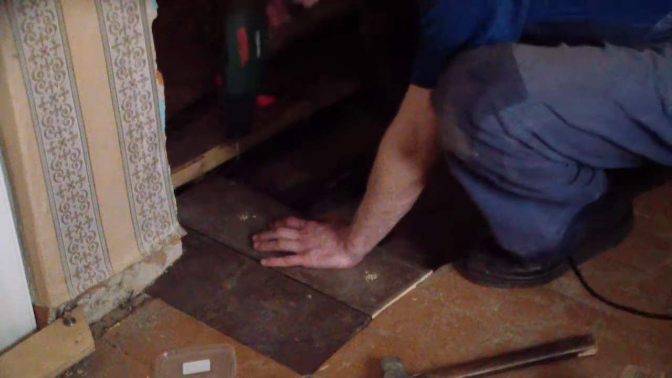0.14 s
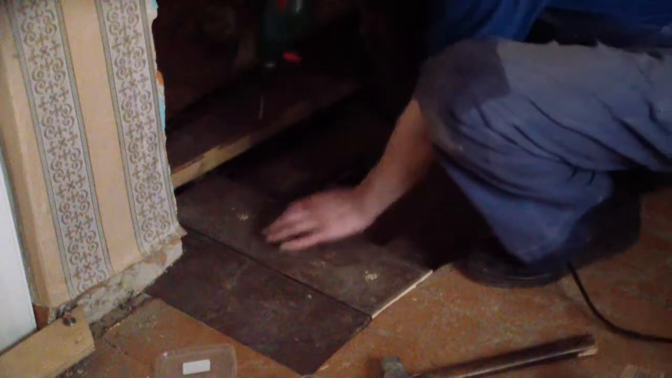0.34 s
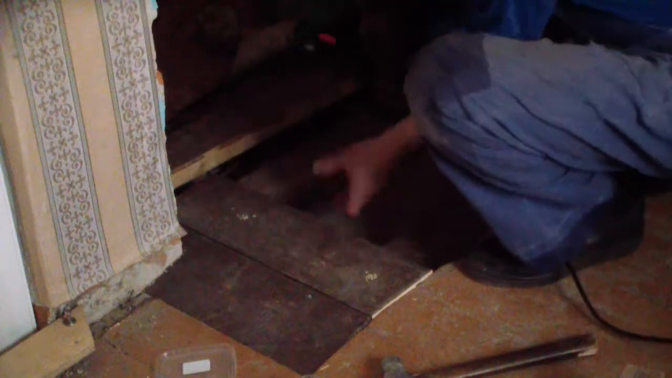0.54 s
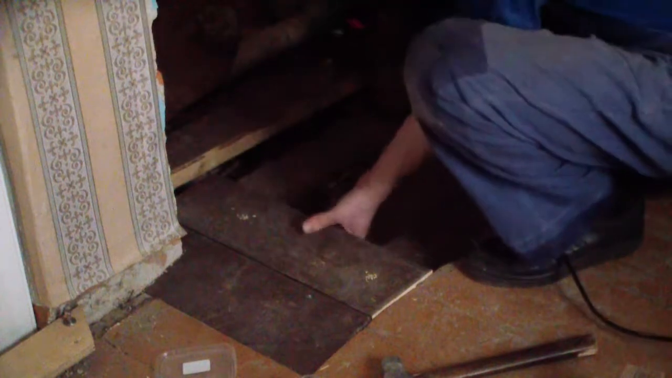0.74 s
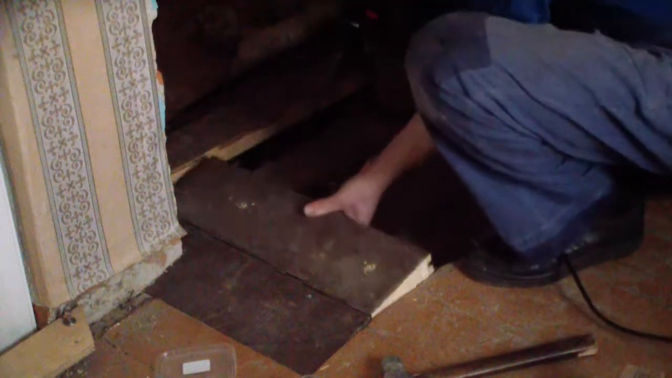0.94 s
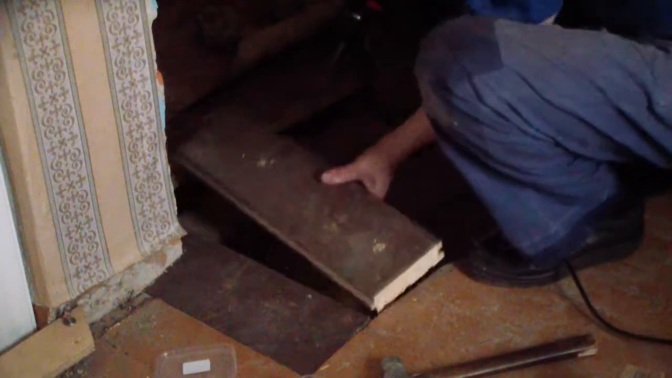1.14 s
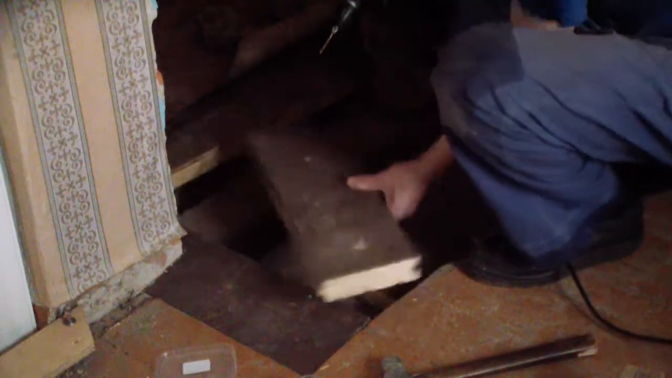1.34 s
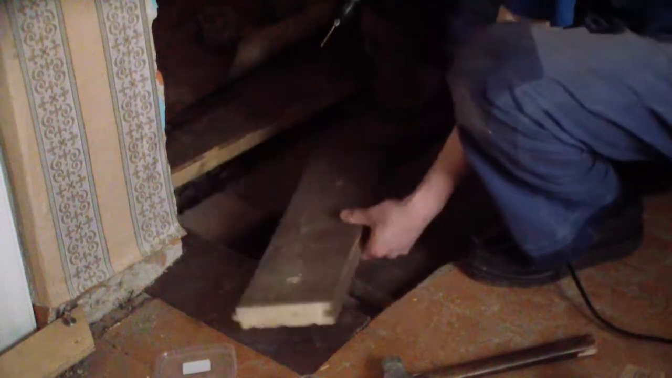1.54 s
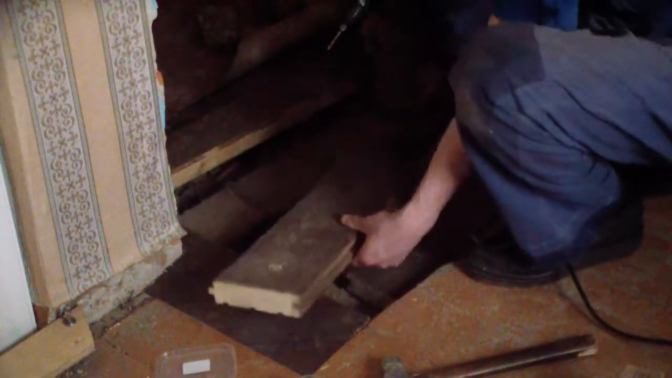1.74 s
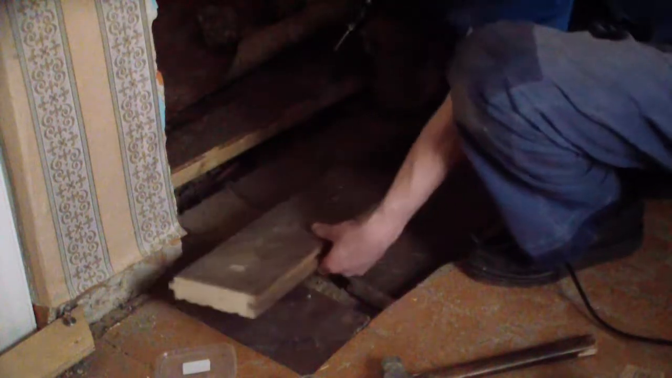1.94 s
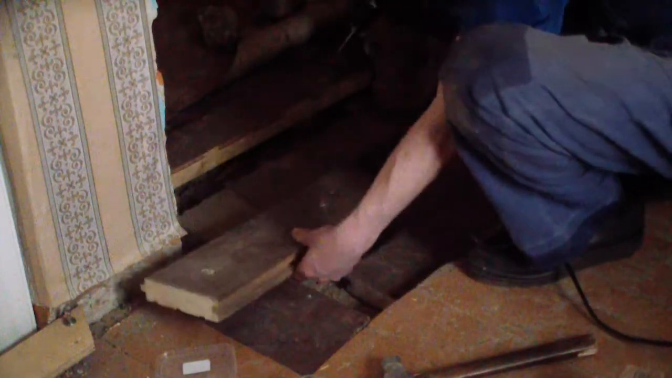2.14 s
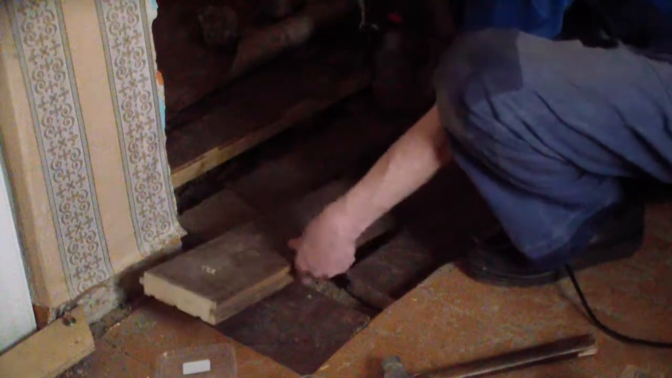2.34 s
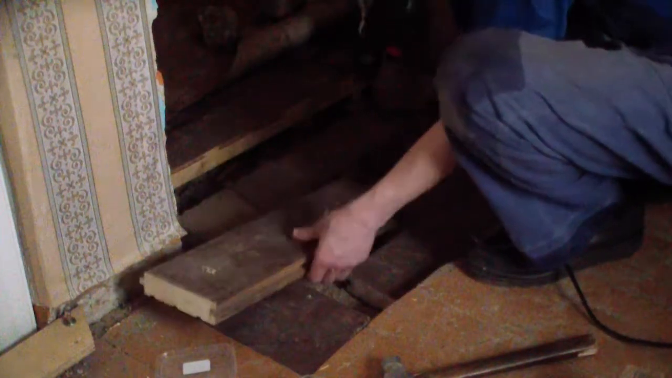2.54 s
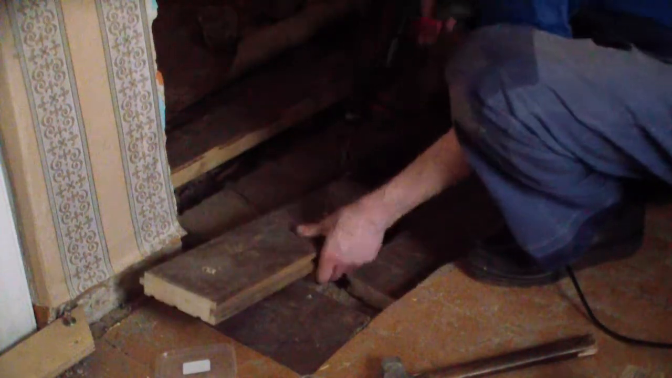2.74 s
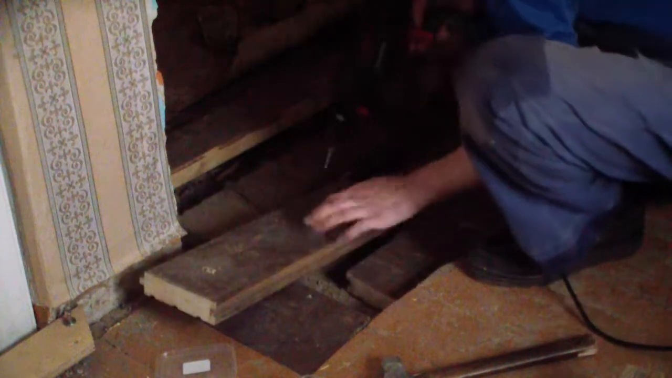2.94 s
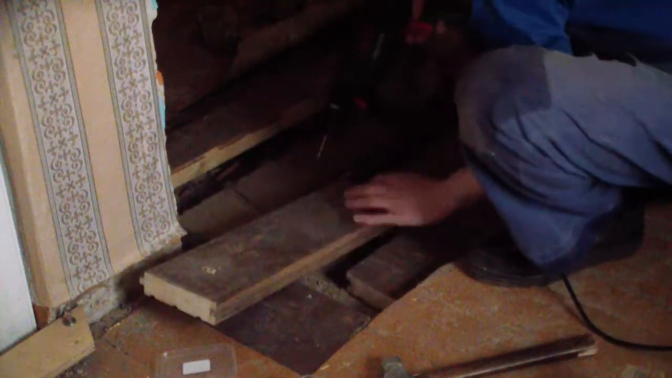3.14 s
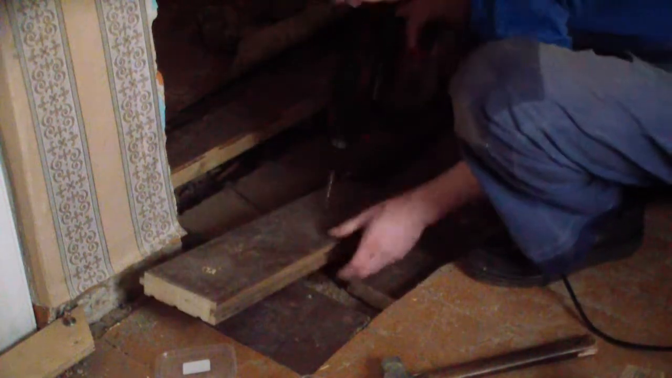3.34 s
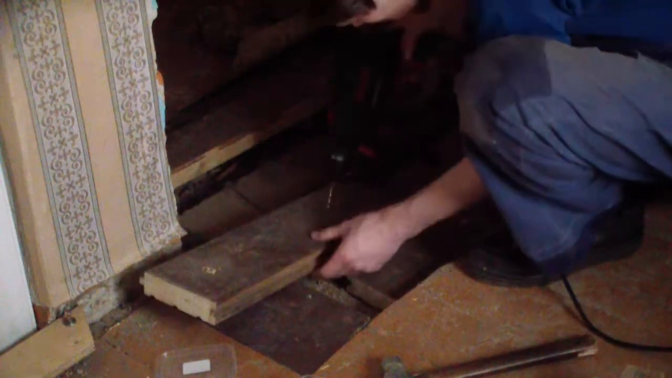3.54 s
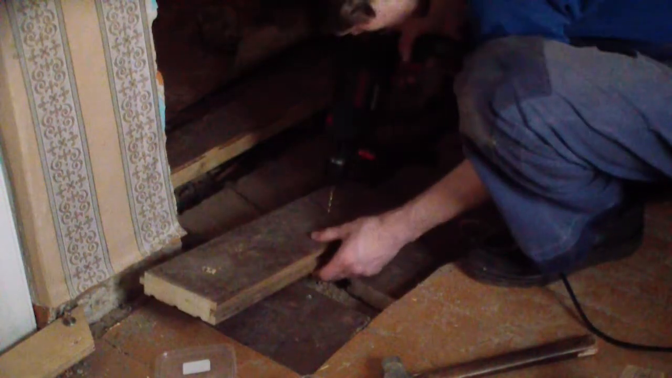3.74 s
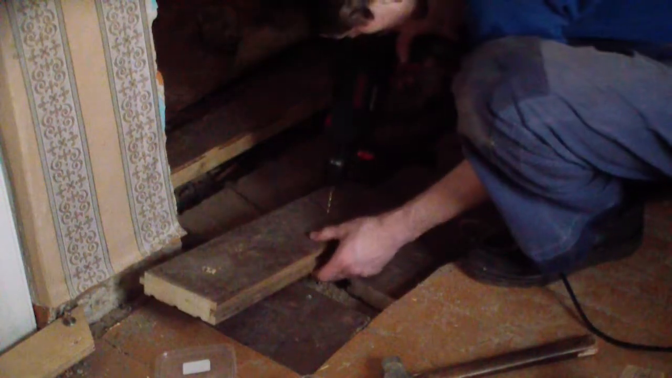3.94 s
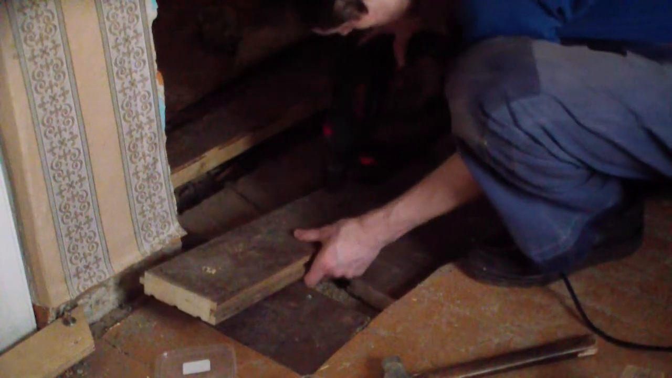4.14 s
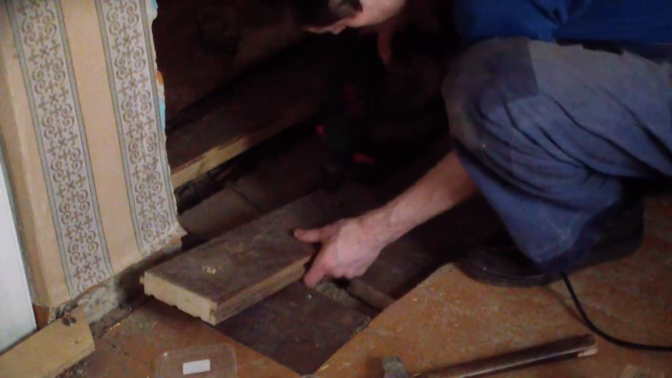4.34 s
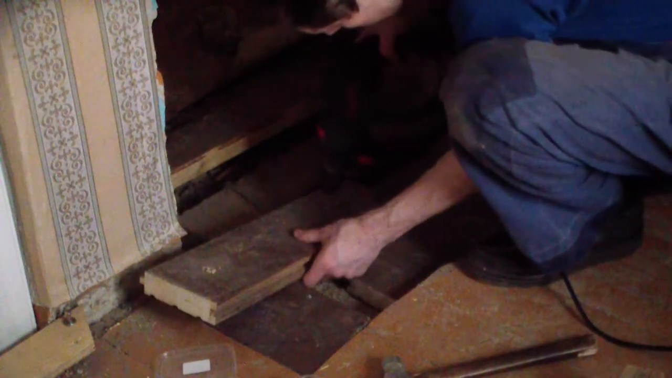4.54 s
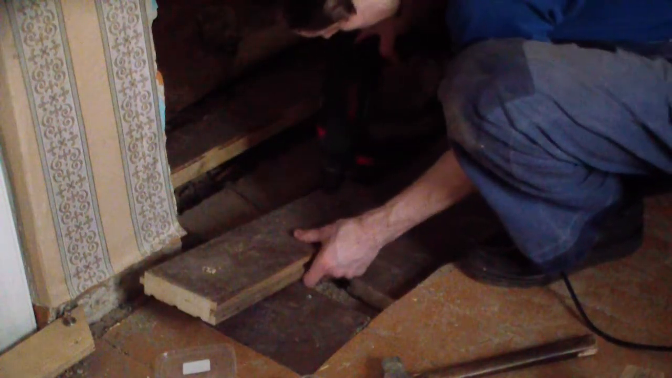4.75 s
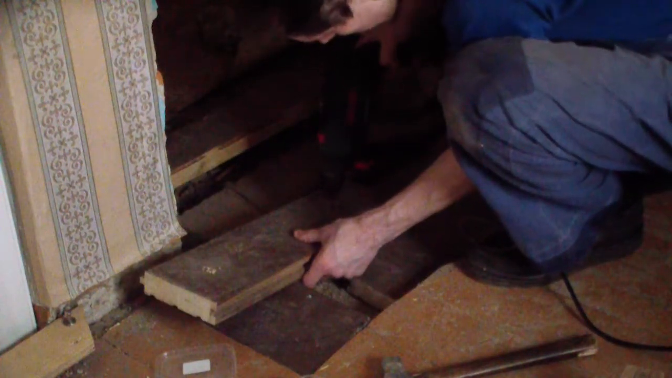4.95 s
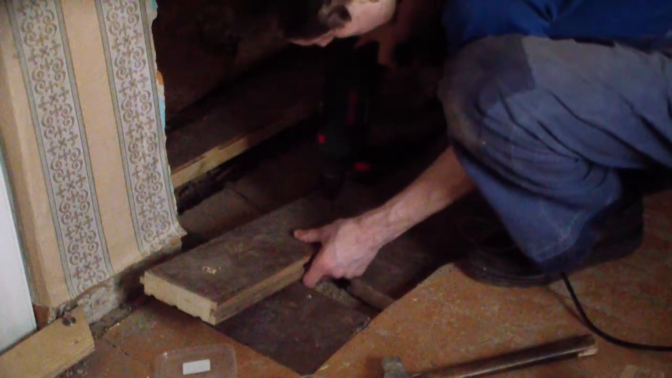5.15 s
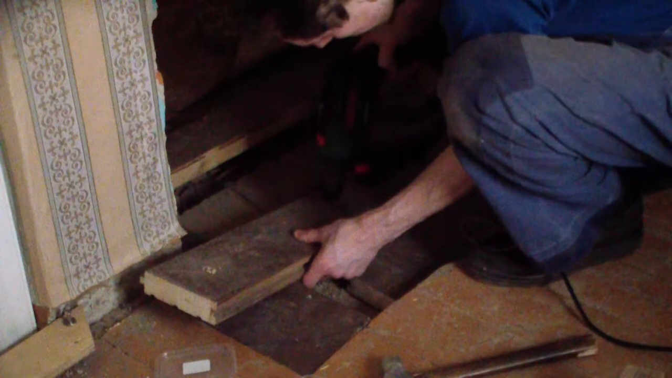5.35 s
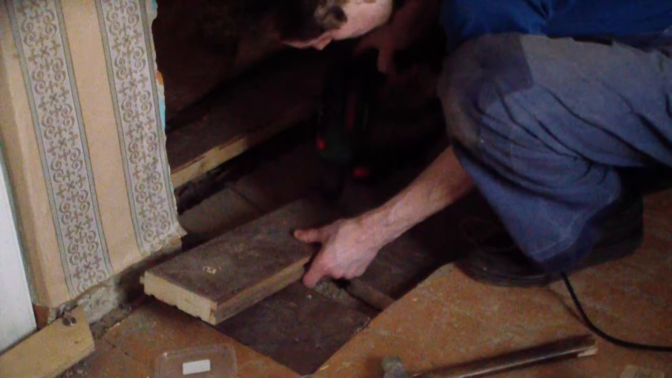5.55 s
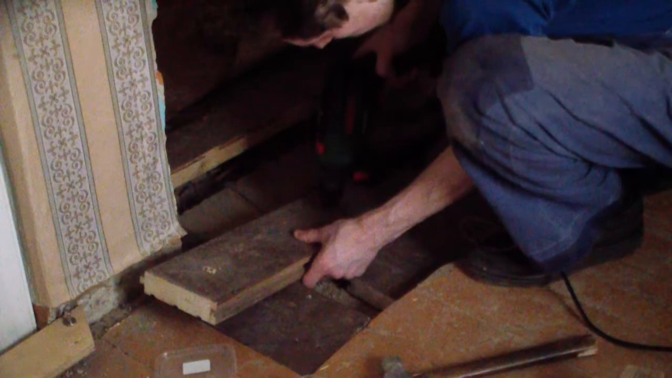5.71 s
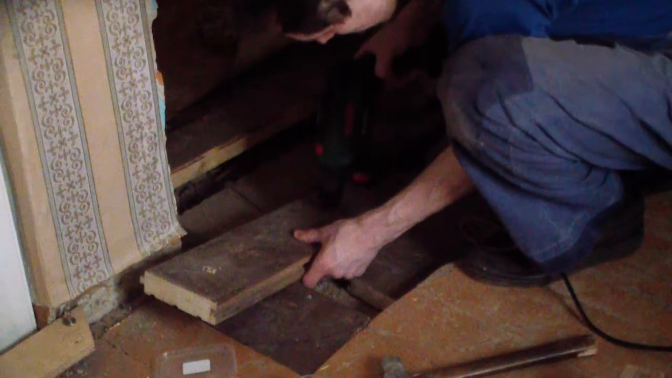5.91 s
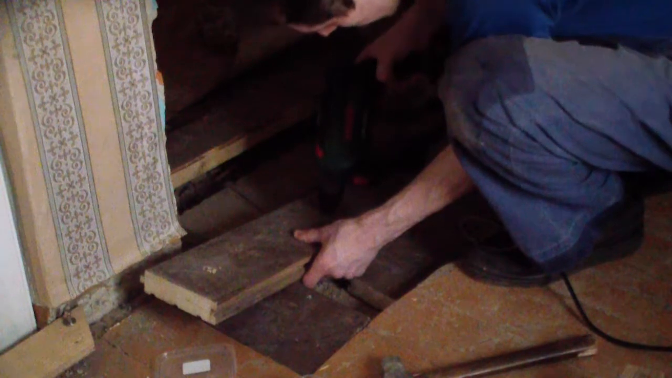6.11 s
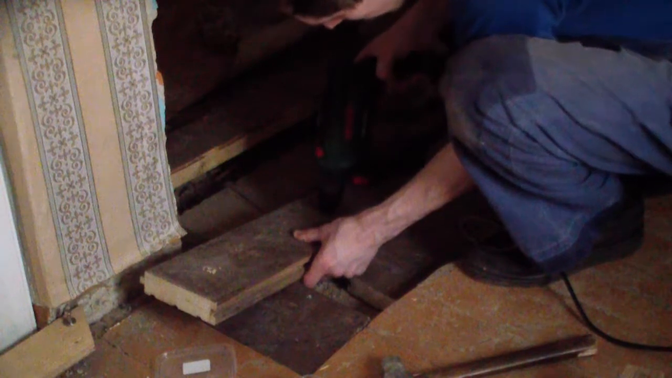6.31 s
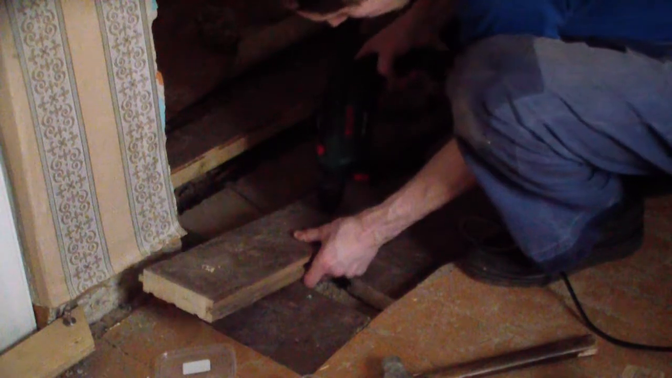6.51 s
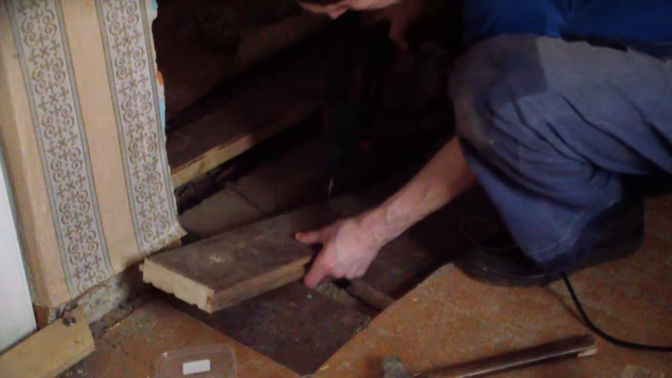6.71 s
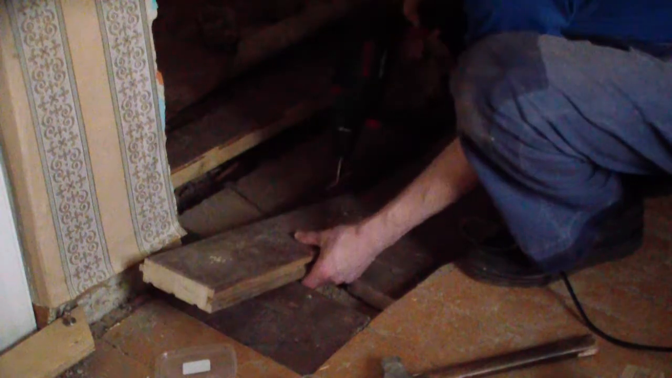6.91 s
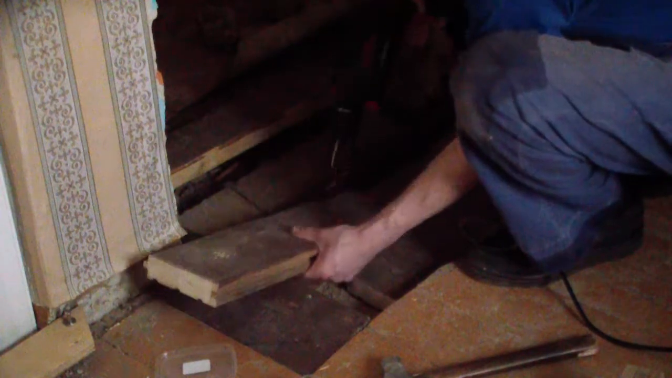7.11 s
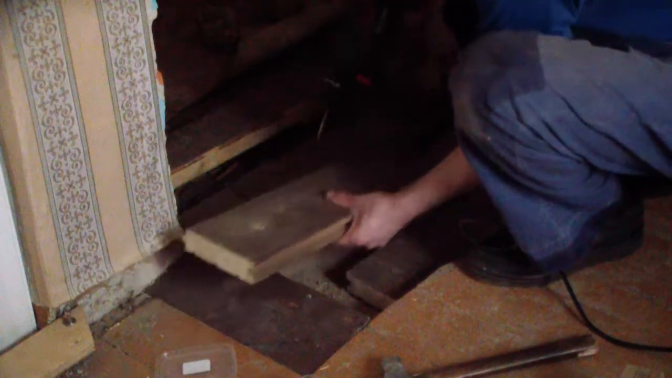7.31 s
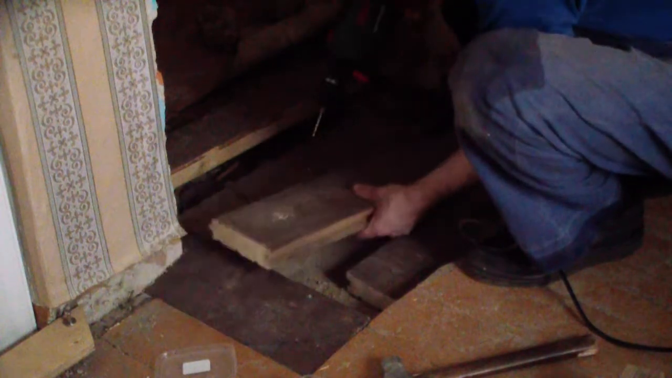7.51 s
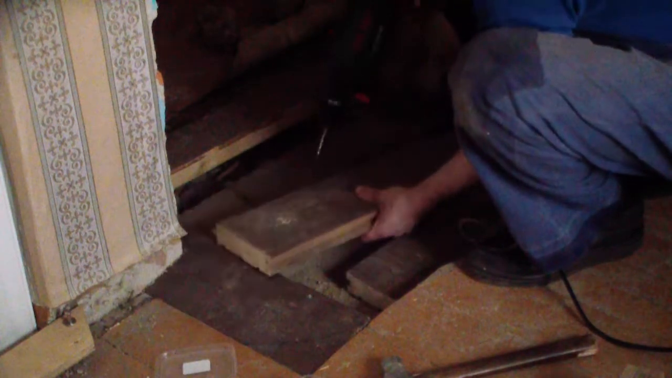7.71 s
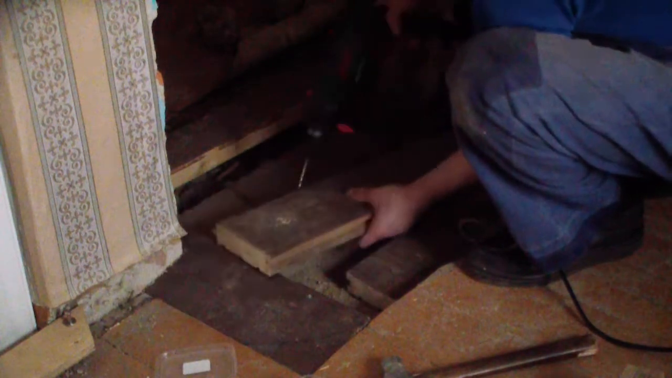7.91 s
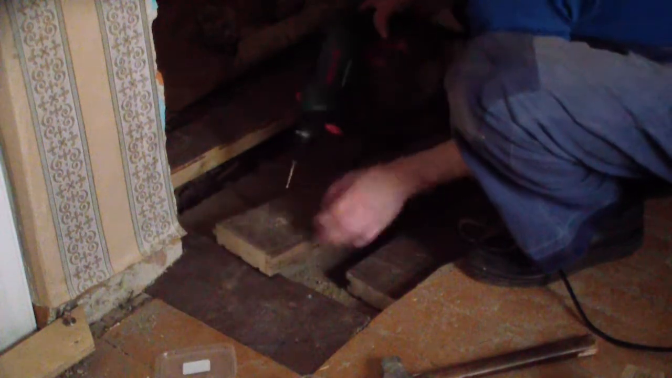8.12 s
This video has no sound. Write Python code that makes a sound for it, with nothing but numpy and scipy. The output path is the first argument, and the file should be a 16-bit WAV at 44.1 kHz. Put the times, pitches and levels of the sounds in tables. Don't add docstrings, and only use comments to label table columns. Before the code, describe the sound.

Close-up woodworking in a reverberant bare room. A drill coasts to silence while a hand brushes wood; a board thumps and rattles onto a hollow floor, with harder knocks that make loose metal ping. After soft scrapes, slaps and creaks comes a near-quiet pause. Sharp trigger clicks start a bright geared whine, the board hums under the bit, a loud bang marks breakthrough, and the falling whine continues through double wooden clunks.

```python
import sys
import numpy as np
from scipy import signal
from scipy.fft import rfft, irfft
from scipy.io import wavfile
from scipy.ndimage import uniform_filter1d, map_coordinates

SR = 44100
rng = np.random.default_rng(int(sys.argv[2]) if len(sys.argv) > 2 else 0)


def wav_record(signal):
    frames = np.transpose(np.atleast_2d(signal))
    bounded = np.clip(frames, -1, 1)
    quanta = np.round(bounded * 32767).astype(np.int16)
    wavfile.write(sys.argv[1], SR, quanta)


def elevation(decibels):
    levels = np.asarray(decibels, float)
    return 10 ** (levels / 20)


N = 360297
T = np.arange(N) / SR
ON_S, THROUGH_S, OFF_S = 4.84, 6.65, 6.818
TEETH, GEAR, BLADES = 8, 14, 13


def evened(x):
    return x / np.sqrt(np.mean(x ** 2) + 1e-20)


def read(points, hz):
    f, value = np.transpose(points)
    return np.interp(np.log(hz + 1), np.log(f + 1), value)


def colour(x, points):
    hz = np.fft.rfftfreq(len(x), 1 / SR)
    return irfft(rfft(x) * elevation(read(points, hz)), len(x))


def band(x, lo_hz, hi_hz):
    return signal.sosfilt(signal.butter(2, [lo_hz, hi_hz], "bandpass", fs=SR, output="sos"), x)


def ring(x, modes):
    out = 0
    for hz, width_hz, db in modes:
        pole = np.exp((2j * hz - width_hz) * np.pi / SR)
        out = out + elevation(db) * signal.lfilter([1 - abs(pole)], [1, -pole], x).imag
    return out


def wander(count, hz, at=None):
    knots = rng.standard_normal(2048)
    grid = np.arange(0, count + 64, 64)
    coarse = map_coordinates(knots, [grid * hz / SR], order=3, mode="wrap")
    return np.interp(np.arange(count) if at is None else at, grid, coarse)


def grit(count, per_s, spread_db):
    chance, size = rng.random(count), rng.standard_normal(count)
    return (chance < per_s / SR) * np.sign(size) * elevation(spread_db * abs(size))


def swell(s, db, rise_s, fall_s):
    t = T[::16]
    away = np.where(t < s, (s - t) / rise_s, (t - s) / fall_s)
    return np.repeat(elevation(db - 20 * away), 16)[:N]


def swells(rows):
    return sum(swell(*row) for row in rows)


def add(mix, s, sound):
    part = mix[round(s * SR):][:len(sound)]
    part += sound[:len(part)]


# f/Hz, t60/s
ROOM_DECAY = [(100, 0.36), (400, 0.64), (1500, 0.61), (5000, 0.54), (14000, 0.21)]


def tail(stretch):
    hz, t, z = signal.stft(rng.standard_normal(SR // 2), SR, nperseg=256)
    t60_s = stretch * read(ROOM_DECAY, hz)[:, None]
    h = signal.istft(z * elevation(-60 * t / t60_s), SR, nperseg=256)[1]
    return h / np.linalg.norm(h)


# f/Hz, level/dB per Hz
HUSH_SPECTRUM = [(15, -54), (25, -5), (123, -9.5), (161, -5.5), (206, -12), (256, -10.5), (285, -8.5),
                 (363, -13.5), (531, -19), (2690, -25), (3160, -24.5), (7310, -31), (16000, -31.5)]


def hush(db):
    return elevation(db) * evened(colour(rng.standard_normal(N), HUSH_SPECTRUM))


# peak t/s, level/dB, rise/s, fall/s
WEIGHT_SHIFTS = [(.4, -63, .1, .5), (.75, -53, 0.16, .04), (.97, -52, .1, .06), (1.41, -59, .15, .1),
                 (1.72, -57, .2, 0.23), (2.62, -42, .05, 0.088), (2.89, -36, 0.079, 0.084),
                 (3.04, -48, 0.18, 0.27), (3.25, -54, 0.19, 1), (3.72, -40.5, 0.12, 0.2),
                 (4.04, -56, 0.31, 0.18), (4.21, -62, .4, 0.35)]


def weight():
    return evened(band(rng.standard_normal(N), 36, 94)) * swells(WEIGHT_SHIFTS)


# f/Hz, width/Hz, level/dB
PLANK_MODES = [(100, 18, -5), (140, 50, 3.5), (183, 17, -3.5), (231, 87, -1.5), (291, 47, 1), (342, 29, -1),
               (405, 39, 1), (489, 55, -3), (545, 116, -5), (636, 95, -6.5), (872, 93, -13.5),
               (1160, 32, -14.5)]
# peak t/s, level/dB, rise/s, fall/s
BOARD_DRAGS = [(.39, -40, 0.27, 0.61), (.88, -53, 0.12, 1), (.97, -27, 0.023, 0.069), (1.3, -61, .05, 0.41),
               (1.74, -54.5, 0.18, .6), (2.0, -64, 0.18, .06), (2.62, -66, .05, 0.37),
               (2.88, -47, .25, 0.18), (3.1, -51, 0.15, 0.36), (3.38, -52.5, 0.35, .06),
               (3.73, -55, .05, 0.27), (4.04, -53, 0.024, 0.13), (4.21, -47, 0.13, 0.33),
               (4.822, -46.5, 0.11, 0.07)]


def drags():
    catches = ring(grit(N, 1500, 1.8), PLANK_MODES[4:])
    return evened(band(catches, 220, 1530)) * swells(BOARD_DRAGS)


# f/Hz, level/dB per Hz
RASP_SPECTRUM = [(590, -30), (1000, -5), (1200, -0.5), (1380, -6.5), (1560, -1.5), (1830, -8), (2930, -8),
                 (3450, -11), (7000, -14), (9100, -18), (15400, -120)]
# peak t/s, level/dB, rise/s, fall/s, dust fizz relative level/dB
DUST_STROKES = [(.36, -49, 0.034, 0.069, 0), (.61, -39, 0.55, 0.088, -10),
                (0.972, -41.5, 0.075, 0.42, -7.5), (1.4, -61.5, 0.15, .15, -20),
                (1.53, -65, 0.12, 0.25, -13), (1.97, -53, 0.46, 0.1, -9), (2.72, -51, 0.34, 0.7, -6),
                (2.872, -45.5, 0.011, 0.091, -6), (2.915, -42.5, 0.072, 0.03, 0),
                (0.829, -46, 0.6, 0.081, -22), (3.071, -51, 0.005, 0.19, 9.5), (3.41, -55, 0.026, 1, -2.5),
                (3.13, -49, 0.12, 0.016, 4), (3.38, -50.5, 0.63, 0.19, -27), (3.71, -65, 0.025, .15, -14),
                (4.1, -50.5, .15, 0.49, -12), (4.732, -48.5, 0.0053, 0.062, 11),
                (4.835, -46.5, 0.11, .04, -24)]


def strokes():
    rasp = evened(colour(grit(N, 6000, 4.6), RASP_SPECTRUM))
    fizz = evened(band(grit(N, 9000, 1.5), 3300, 11600))
    return sum(swell(*row) * (rasp + elevation(fizz_db) * fizz) for *row, fizz_db in DUST_STROKES)


# f/Hz, width/Hz, level/dB
BIT_MODES = [(1220, 44, -4), (2680, 50, -4), (2920, 60, 2), (3700, 70, -8), (5400, 90, -1), (5750, 60, -6)]
# peak t/s, level/dB, rise/s, fall/s
PALM_SLAPS = [
    (2.876, -39, .012, .12),
    (2.915, -47, .04, .12),
]


def chime():
    return evened(ring(grit(N, 2500, 3), BIT_MODES)) * swells(PALM_SLAPS)


# t/s, level/dB, f/Hz, free time/s
PIPE_RINGS = [
    (0.551, -44.5, 1310, 0.33),
    (2.008, -27.5, 1590, 0.05),
    (2.173, -36, 1590, 0.097),
    (2.313, -18.5, 1590, 0.041),
    (2.415, -17.5, 1590, 0.03),
    (2.527, -42, 1590, 0.0091),
    (3.077, -39, 1590, 0.089),
    (3.85, -47.5, 1590, 0.044),
    (4.095, -39, 1590, 0.063),
    (6.647, 5, 1490, 0.0032),
]


def pipe(db, hz, free_s):
    t = T[:24000]
    pair = np.sin(2 * np.pi * hz * t) + 0.069 * np.sin(2 * np.pi * (hz + 45) * t + 6 * rng.random())
    flutter_db = (1.3 + 12 * free_s) * wander(len(t), 97)
    damped_db = -9 * np.clip((t - free_s) / 0.006, 0, 1) - 260 * np.maximum(t - free_s, 0)
    attack_s = 0.00041 * elevation(np.clip(-34 - db, 0, 9))
    return elevation(db - 8.7 * t / free_s + damped_db + flutter_db) * pair * np.minimum(t / attack_s, 1)


# f/Hz, width/Hz, level/dB
TAP_MODES = [(850, 23, -1), (984, 50, 1), (1198, 20, 7), (1490, 73, -28), (2130, 40, -3), (2330, 50, -8),
             (2780, 60, -6.5), (3460, 80, -9), (4620, 55, -14), (5550, 52, -14)]
# t/s, level/dB, treble level/dB
CHUCK_TAPS = [
    (3.402, -20.5, -32.5),
]


def tap(db, treble_db):
    t = T[:12000]
    fade = (elevation(-90 * t) + 0.5 * elevation(-1200 * t)) * elevation(-500 * np.maximum(t - 0.085, 0))
    skid = rng.standard_normal(len(t)) * fade
    low = ring(skid, TAP_MODES) + 0.077 * band(skid, 740, 1700)
    high = band(skid, 3200, 5300)
    return elevation(db - 18.0) * evened(low) + elevation(treble_db - 16.0) * evened(high)


# t/s, level/dB, f/Hz
SNAPS = [(0.378, -25, 3350), (0.4994, -25, 2780), (1.983, -36.5, 2500), (2.1207, -36, 2000),
         (2.416, -31, 1600), (4.7301, -29.5, 6800), (4.8437, -15, 7700), (4.853, -20, 5840),
         (4.863, -9, 6500), (4.89, -12, 8500), (4.8748, -13, 4530), (6.6456, 2, 2840)]


def click(db, hz):
    t = T[:1200]
    snap = rng.standard_normal(len(t)) * elevation(-3000 * t) * np.minimum(t / 0.00074, 1)
    snap = band(snap, 1400, 8900) + 2.0 * ring(snap, [(hz, 900, 0)])
    return elevation(db) * snap / np.std(snap[:130])


# f/Hz, level/dB per Hz
CRACK_SPECTRUM = [(500, -36), (900, -3), (1400, -4.5), (2000, -0.5), (2300, -9), (2620, -4), (3000, -11),
                  (8000, -21.5), (15500, -31)]
# t/s, thud level/dB, crack level/dB, thud centre f/Hz, rattle/s
BOARD_KNOCKS = [(0.428, -15, -55, 330, 0.043), (0.966, -18, -46, 336, 0.093),
                (0.975, -1.5, -14.5, 230, 0.065), (1.008, -3.5, -31, 226, 0.052),
                (1.034, -4, -51, 143, 0.017), (1.086, -7, -43, 140, 0.036), (1.982, -38, -35, 600, 0.008),
                (2.008, -3.5, -19, 510, 0.048), (2.124, -13, -24.5, 111, 0.048),
                (2.186, -24.5, -21, 404, 0.11), (2.311, 0, -11, 520, 0.086), (2.367, -1, -25, 183, 0.038),
                (2.417, 0.5, -21, 183, 0.042), (2.463, -9, -40, 320, 0.061), (2.498, -16, -35, 400, 0.017),
                (2.878, -17.5, -50, 151, 0.041), (6.6469, 14, -10, 457, 0.021),
                (6.698, -0.5, -28, 470, 0.028), (6.754, -11, -26, 480, 0.016),
                (7.621, -4.5, -14.5, 290, 0.037), (7.651, -9, -44, 288, 0.046), (7.721, 0, -19, 161, 0.052),
                (7.765, -4, -29, 154, 0.023)]


def knock(thud_db, crack_db, hz, rattle_s):
    t = T[:14000]
    first = np.clip(0.85 - rattle_s / 0.098, 0, 1)
    shake = elevation(-500 * np.maximum(t - rattle_s, 0))
    blows = 0.47 * grit(len(t), 300, 0.26) * shake + 2 * first * (t == 0)
    planks = [(f, w, db - 10 * abs(np.log2(f / hz))) for f, w, db in PLANK_MODES]
    thud = band(band(ring(blows, planks), 98, 2600), 100, 4100)
    crack_gain = first * elevation(-1500 * t) + 1.1 * shake * elevation(-150 * t)
    crack = colour(rng.standard_normal(len(t)), CRACK_SPECTRUM) * crack_gain
    blow = t < 0.04
    thud = elevation(thud_db - 14.5) * thud / np.std(thud[blow])
    return thud + elevation(crack_db - 14.0) * crack / np.std(crack[blow])


# start t/s, gear mesh f/Hz then, friction Hz per s
COAST_RUNS = [
    (0, 1935, 2200),
    (6.818, 4205, 2008),
]
# t/s, sag/Hz
FEED_SAG = [
    (5.32, 70),
    (5.43, 128),
    (5.53, 138),
    (5.73, 140),
    (6.04, 63),
    (6.24, 123),
    (6.4, 58),
    (6.6, 78),
    (6.72, 22),
    (6.818, 0),
]


def speed():
    drag_per_s, kick_hz, free_hz, spin_up_s = 0.17, 1728, 4208, 0.159
    coasts = []
    for s, hz, friction in COAST_RUNS:
        pull_hz = friction / drag_per_s
        coasts.append((hz + pull_hz) * np.exp(-drag_per_s * (T - s)) - pull_hz)
    climb = np.exp(-(abs(T - ON_S) / spin_up_s) ** 1.6)
    driven = free_hz - (free_hz - kick_hz) * climb - np.interp(T, *np.transpose(FEED_SAG))
    return np.select([T < ON_S, T < OFF_S], [np.maximum(coasts[0], 30), driven], coasts[1])


BOARD_DRONES = [9, 13, 16]
# peak t/s, level/dB, rise/s, fall/s
BOARD_SHAKES = [
    [(6.05, -26, 0.84, .3), (6.23, -31, .1, .16), (6.7, -36, 0.14, .3)],
    [(5.1, -34, 0.51, 0.91), (6.1, -28.5, 2.2, 0.9), (6.3, -29, .5, .15), (6.69, -20, 0.048, .12)],
    [(5.22, -40, .3, 1.5), (6.1, -22, 1.56, 0.27), (6.46, -17.5, 0.35, 0.23), (6.662, -11.5, 0.014, 0.24),
     (6.73, -21, .1, .05)],
    [(4.92, -35, 0.16, 0.19), (5.1, -38, .3, 1.6), (6.15, -35, 0.15, 0.64), (6.6, -40, .1, .3),
     (6.72, -27, .15, .1)],
]


def bite():
    chuck_turns = np.cumsum(speed() / TEETH / GEAR) / SR
    chips = grit(N, 900, 2.0)
    parts = []
    for k in BOARD_DRONES:
        phase = 2 * np.pi * k * chuck_turns + 1.6 * wander(N, 25)
        parts.append(elevation(0.97 * wander(N, 40)) * np.cos(phase))
    parts[-1] = parts[-1] + 0.5 * evened(ring(chips, [(581, 34, 0)]))
    parts.append(band(band(chips, 41, 244), 44, 320))
    out = 0
    for rows, part in zip(BOARD_SHAKES, parts):
        gain = np.max([swell(*row) for row in rows], axis=0)
        out = out + gain * evened(part)
    return out * np.interp(T, [ON_S, ON_S + 0.06, OFF_S - 0.07, OFF_S - 0.02], [0, 1, 1, 0])


def levels(mesh_hz, load):
    driven = (T >= ON_S) & (T < OFF_S)
    away_s = (T < ON_S) * np.maximum(T - 0.24, 0)
    start = np.clip(1 - (T - ON_S) / 0.037, 0, 1) * driven
    buried = (T > THROUGH_S) * np.exp(-((T - THROUGH_S) / 0.071) ** 2)
    stalling_s = (T < ON_S) * np.maximum(T - 0.48, 0)
    coast_db = -20 + 6.5 * np.log2(mesh_hz / 4208) + 11.5 * away_s
    spark_db = -22.5 + 3.5 * load - 9 * start
    casing_db = np.where(driven & (T <= THROUGH_S), spark_db, coast_db) - 9 * buried
    fan_db = np.where(T > OFF_S, -8, -4.5) - np.minimum(30 * away_s, 30) - 18 * start + 4 * buried
    whine_db = np.where(driven, -7, -2.5) - 10 * start + 8 * buried - 14 * away_s - 88 * stalling_s
    return casing_db, fan_db, whine_db


# f/Hz, width/Hz, level/dB
CASING_MODES = [(1103, 260, 15), (1500, 33, 0.5), (1830, 520, 1), (2780, 610, -2), (3160, 1000, 6),
                (4170, 470, -2.5), (4930, 690, 1.5), (6300, 620, -16), (7860, 890, -6.5), (8500, 1800, -1),
                (10900, 1500, -9.5), (11900, 1900, -6), (15100, 1800, -3)]


def shine(hz):
    gain = sum(elevation(db) / (1 + (2 * (hz - f) / width) ** 2) for f, width, db in CASING_MODES)
    return gain * (hz < 16200)


# multiple of the mesh rate, level/dB, added under power/dB
MESH_LINES = [(1, -1, 0.5), (2, 2.5, 1), (2.5, -8, -7), (3, 4, 7.5), (3.5, -16, 4), (4, 1.5, 1),
              (5, 2.5, 5.5), (5.5, -14, 0), (6, 4, 0), (7, 3.5, 0), (8, 4.5, 0), (9, 1, 0), (10, 4, -6),
              (11, -1, 0), (12, 4, 0)]
# multiple of the shaft turn, level/dB
SHAFT_LINES = [(1, -3), (2, 0.5), (3, 0), (4, 0.5), (5, 4.5), (6, 0), (7, 4), (9, -1.5), (10, -10), (13, 7),
               (18, -10)]


def whine(mesh_hz, turns, load, throb):
    live = np.flatnonzero((T < 0.9) | (T >= ON_S))
    slow, turns, out = live[::64], turns[live], np.zeros(N)
    powered = (T[slow] >= ON_S) & (T[slow] < OFF_S)
    pace = mesh_hz[slow] / 4100

    def line(k, gain, blur, blur_hz):
        slip = np.interp(live, slow, blur * wander(N, blur_hz, at=slow))
        flutter_db = 3.3 * np.where(powered, 0.6, 1) * wander(N, 40, at=slow)
        return np.interp(live, slow, gain * elevation(flutter_db)) * np.cos(2 * np.pi * k * turns + slip)

    for k, db, power_db in MESH_LINES:
        line_db = db + power_db * powered - 3.2 * (3.0 - pace)
        out[live] += line(k * TEETH, shine(k * mesh_hz[slow]) * elevation(line_db), 0.6, 90)
    strain = (load * throb ** 2.5)[slow]
    for k, db in SHAFT_LINES:
        line_db = db - 4.5 - 1.5 * (T[slow] > OFF_S) - 20 * (1 - pace)
        effort = 1 if k == BLADES else strain
        out[live] += line(k, effort * elevation(line_db), min(0.23 + 0.17 * k, 0.8), 60)
    return out


# f/Hz, level/dB per Hz
CASING_SPECTRUM = [(59, -56), (100, -7.5), (129, -34), (149, -25), (242, -11.5), (367, -7), (587, -11),
                   (770, -5), (1400, -5.5), (1530, -2.5), (2400, -5.5), (3040, 0), (3990, -6), (4950, -6),
                   (7500, -17), (9750, -22), (16500, -120)]
# f/Hz, level/dB per Hz
FAN_SPECTRUM = [(3820, -12), (6500, -2), (7190, -3.5), (8380, -2.5), (8770, -5), (10800, -5.5), (11700, -5),
                (12300, -0.5), (12700, -4), (15900, -22)]


def drill():
    rate_hz = speed()
    mesh_hz = uniform_filter1d(rate_hz, size=600)
    on = np.where(T < ON_S, np.clip((rate_hz - 30) / 60, 0, 1), np.minimum((T - ON_S) / 0.0052, 1))
    turns = np.cumsum(mesh_hz / TEETH * (1 + 0.0013 * wander(N, 60))) / SR
    load = np.interp(T, [4.85, 5.2, 6.62, 6.7], [0, 1, 1, 0])
    casing_db, fan_db, whine_db = levels(mesh_hz, load)
    throb = elevation(1.4 * load * np.cos(2 * np.pi * turns / GEAR) + 0.47 * wander(N, 30.02))
    casing = colour(rng.standard_normal(N) + 0.2 * grit(N, 1000, 5.2), CASING_SPECTRUM)
    casing = casing / np.std(band(casing, 850, 10300))
    pipe_buzz = evened(ring(grit(N, 400, 4.4), [(1590, 20, 4)]))
    casing = casing + elevation(-9.5) * load * pipe_buzz
    fan = evened(colour(rng.standard_normal(N), FAN_SPECTRUM))
    lines = on * elevation(casing_db + whine_db - 2.5) * whine(mesh_hz, turns, load, throb)
    off_joists = signal.oaconvolve(lines, tail(stretch=0.6))[:N]
    noise = on * elevation(casing_db - 1.5) * (throb * casing + elevation(fan_db + 3.0) * fan)
    return noise + elevation(-2) * lines + elevation(-4) * off_joists


# f/Hz, side minus mid level/dB
STEREO_WIDTH = [(30, -20), (80, -28), (170, -43), (350, -41), (700, -22), (1400, -18), (2800, -14),
                (5600, -8), (10000, -3), (14000, -3.5)]


def scene():
    hush_db = -49.5
    tool = drill() + bite() + strokes() + drags() + weight()
    wood, near = np.zeros(N), np.zeros(N)
    for mix, table, source in ((wood, BOARD_KNOCKS, knock), (wood, SNAPS, click),
                               (near, CHUCK_TAPS, tap), (near, PIPE_RINGS, pipe)):
        for s, *row in table:
            add(mix, s, source(*row))
    wet = elevation(-9.5) * (tool + near) + elevation(-11.0) * wood
    mid = tool + near + elevation(-6.0) * wood + signal.oaconvolve(wet, tail(stretch=0.81))[:N]
    mid += hush(hush_db + 1.2 * wander(N, 1.94))
    mid += chime()
    side = colour(signal.oaconvolve(mid, tail(stretch=0.32))[:N], STEREO_WIDTH)
    side += hush(hush_db - 3.5)
    side += elevation(-20) * band(mid, 3500, 16000)
    return np.array([mid + side, mid - side]) * elevation(np.array([[0.22], [-0.22]]))


def band_limit(x):
    return signal.sosfilt(signal.butter(12, 16250, fs=SR, output="sos"), x)


def record(dry):
    power_db = 10 * np.log10(abs(uniform_filter1d((dry ** 2).mean(0), 300)) + 1e-12)
    fall_db = T * 120.0
    held_db = np.maximum.accumulate(power_db + fall_db) - fall_db
    over_db = np.maximum(held_db + 16.0, 0)
    ducked = dry / elevation(0.46 * uniform_filter1d(over_db, 150))
    low_pass = signal.cheby2(12, 50, 16230, fs=SR, output="sos")
    return band_limit(signal.sosfiltfilt(low_pass, np.clip(ducked, -1, 1)))


dry = scene()
out = record(dry)
wav_record(out)
```